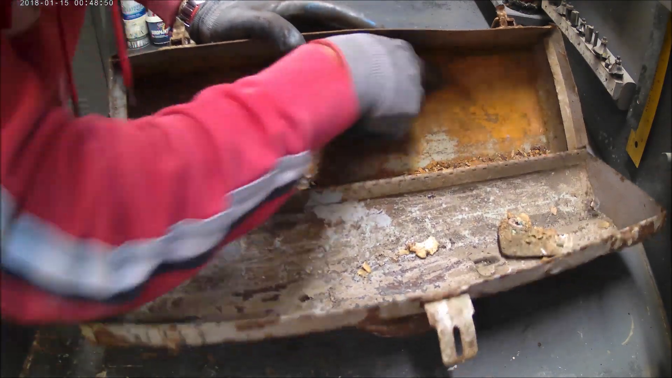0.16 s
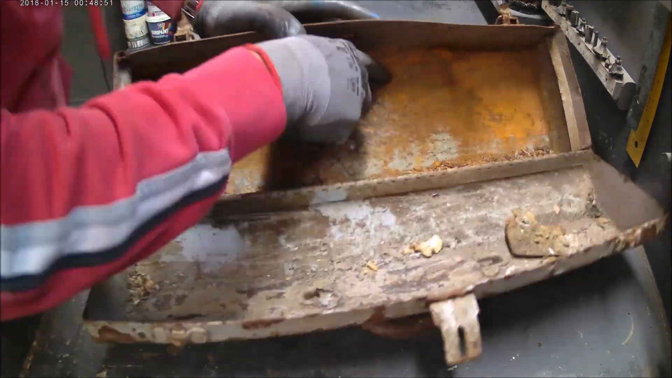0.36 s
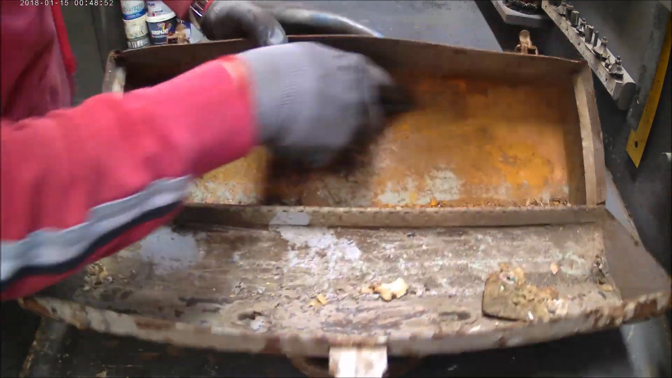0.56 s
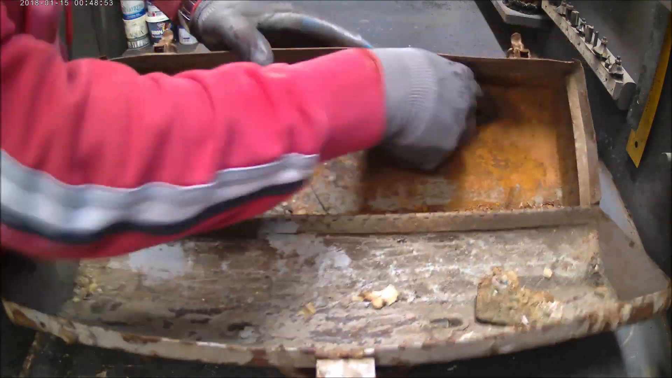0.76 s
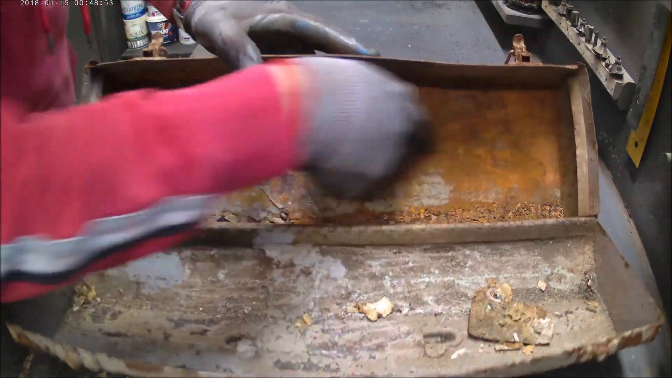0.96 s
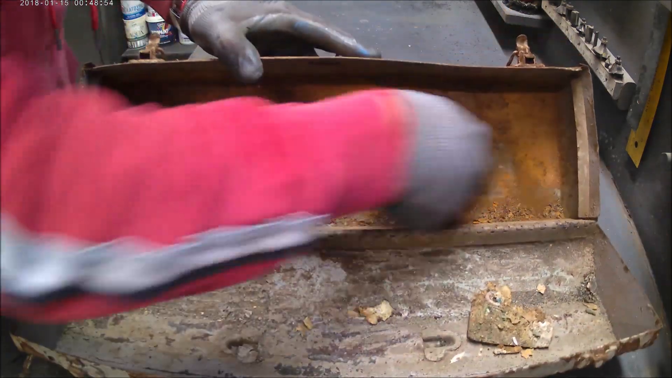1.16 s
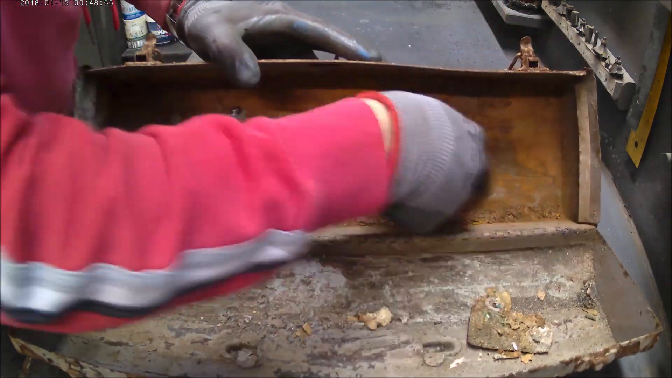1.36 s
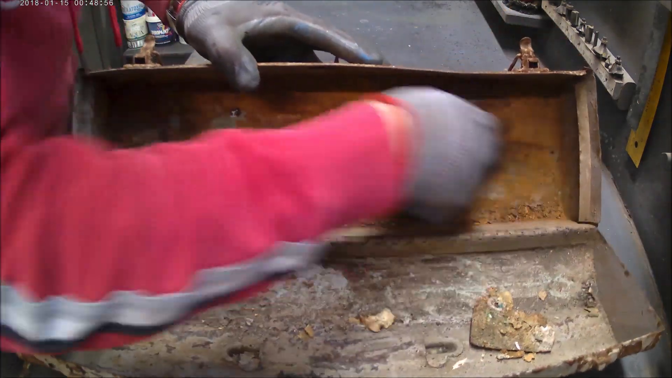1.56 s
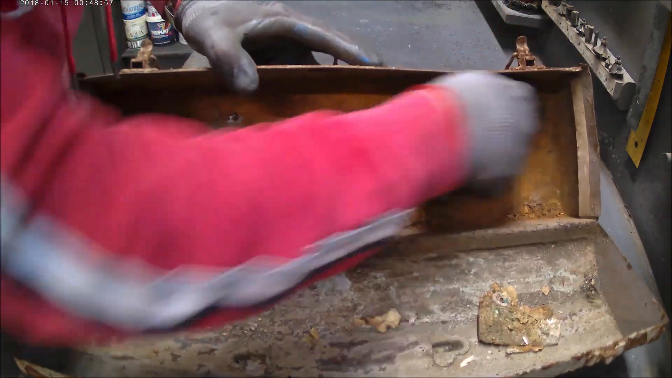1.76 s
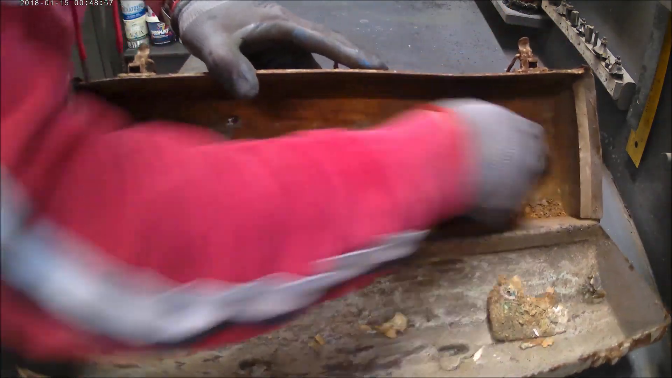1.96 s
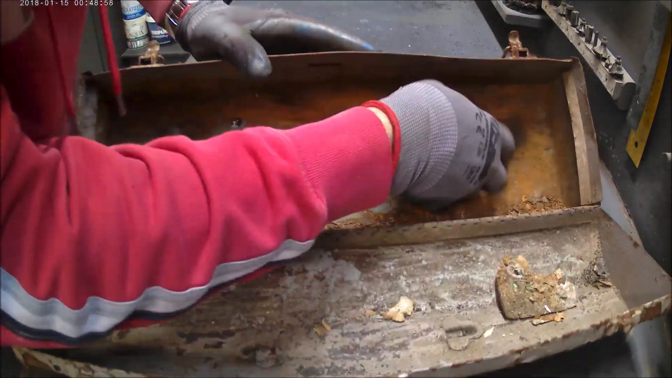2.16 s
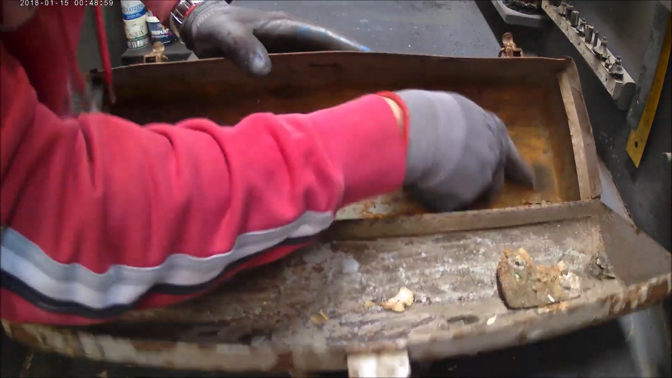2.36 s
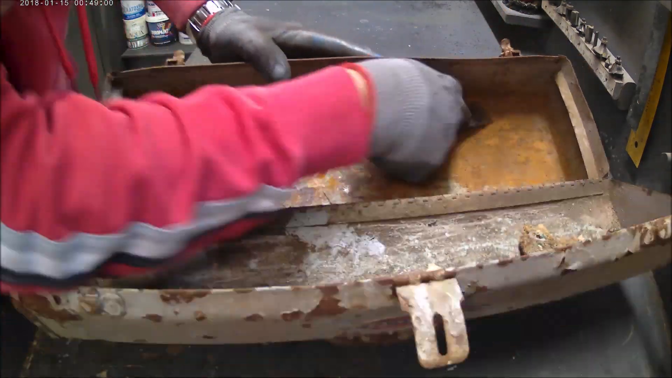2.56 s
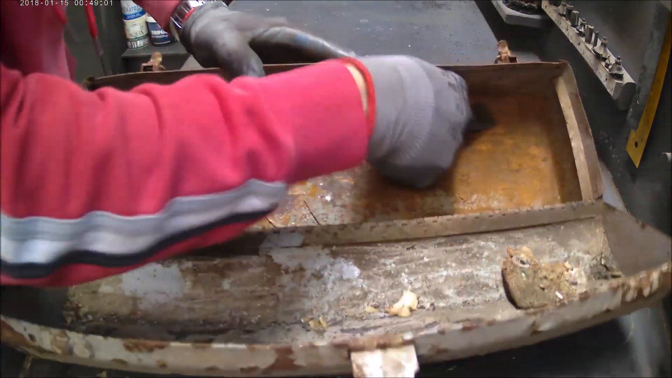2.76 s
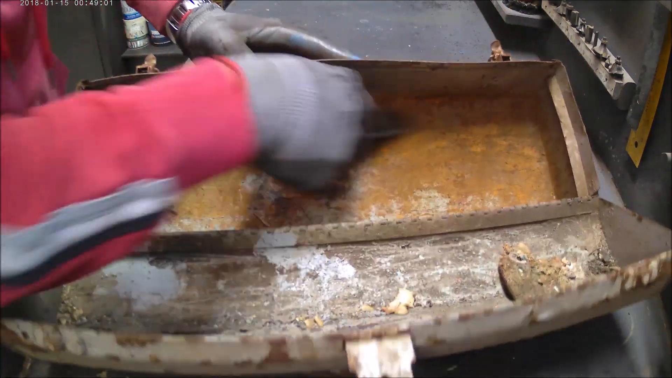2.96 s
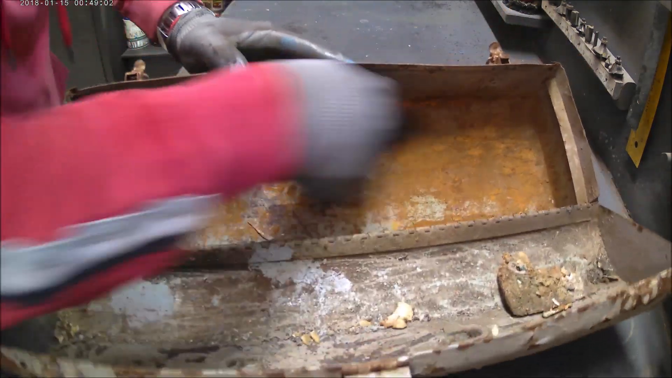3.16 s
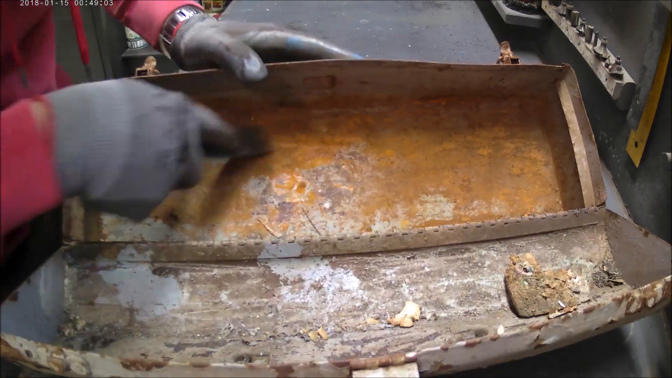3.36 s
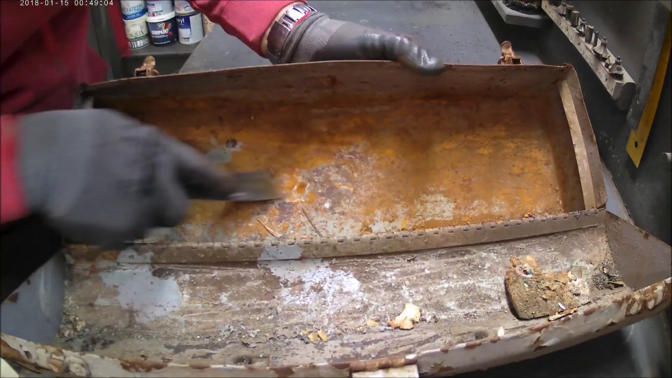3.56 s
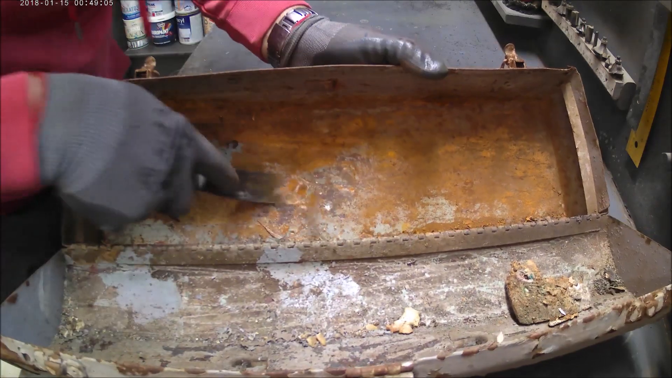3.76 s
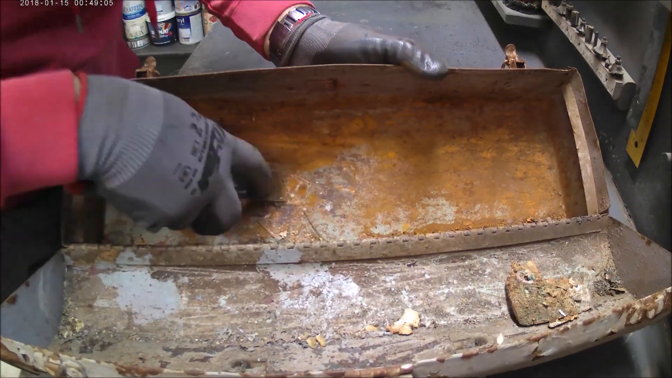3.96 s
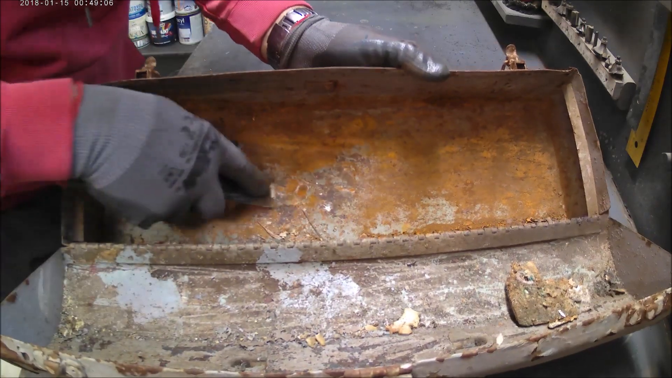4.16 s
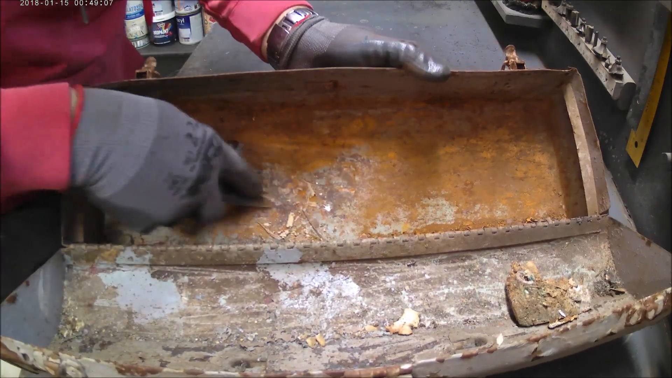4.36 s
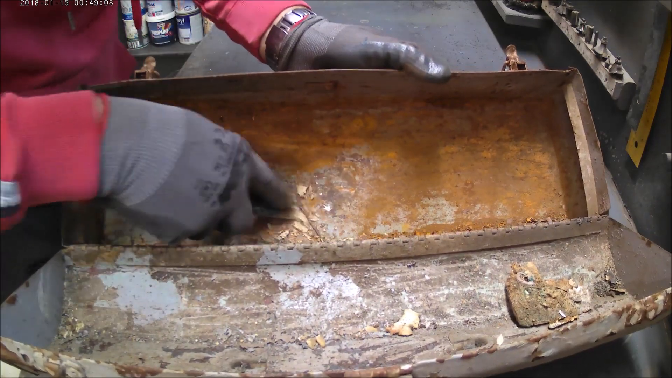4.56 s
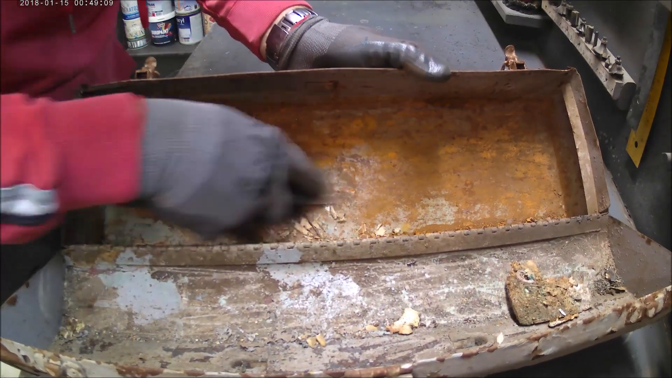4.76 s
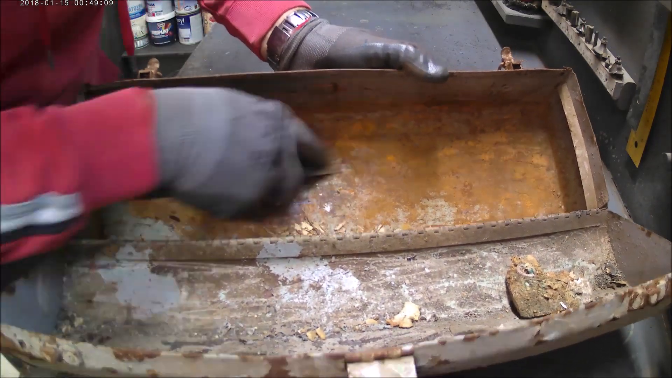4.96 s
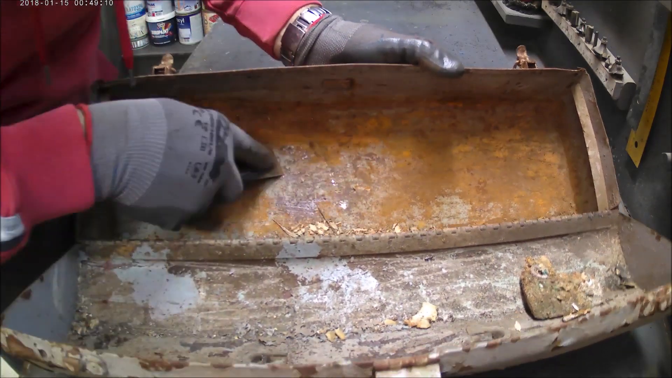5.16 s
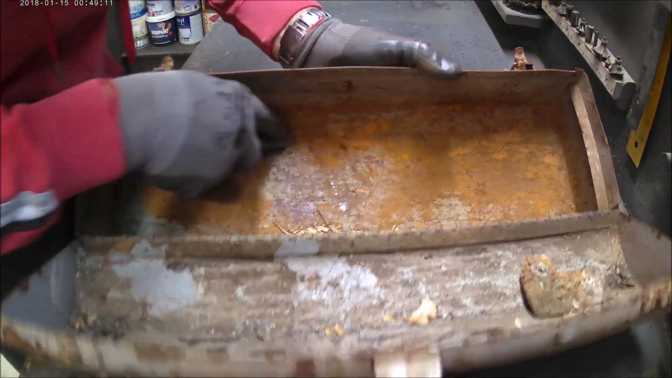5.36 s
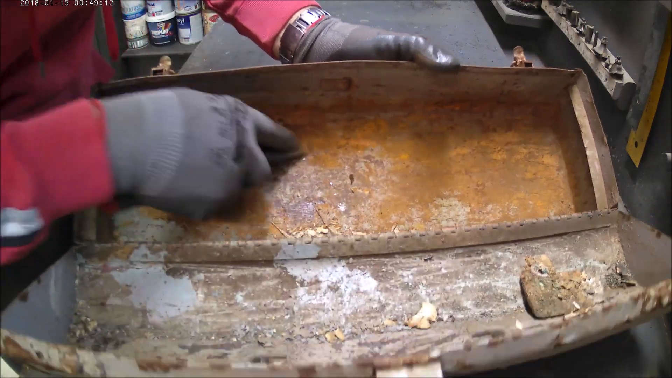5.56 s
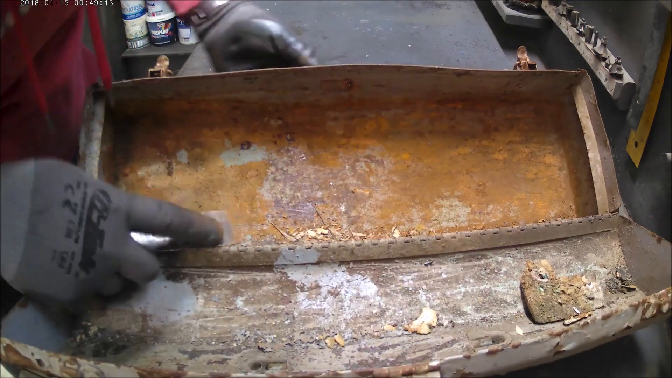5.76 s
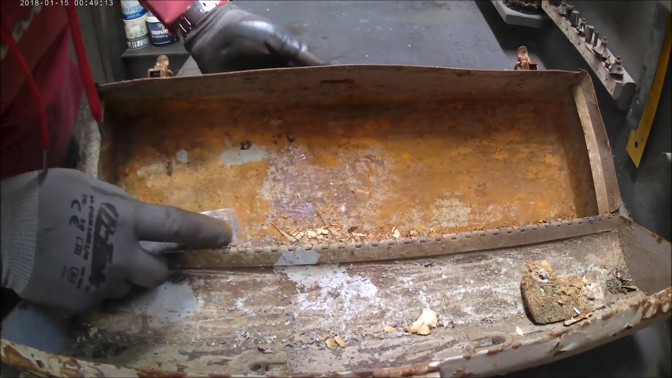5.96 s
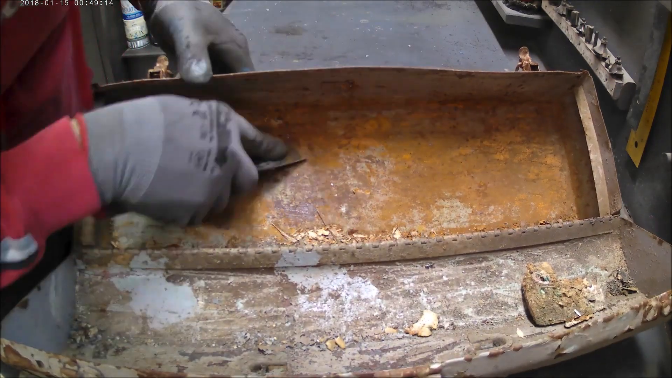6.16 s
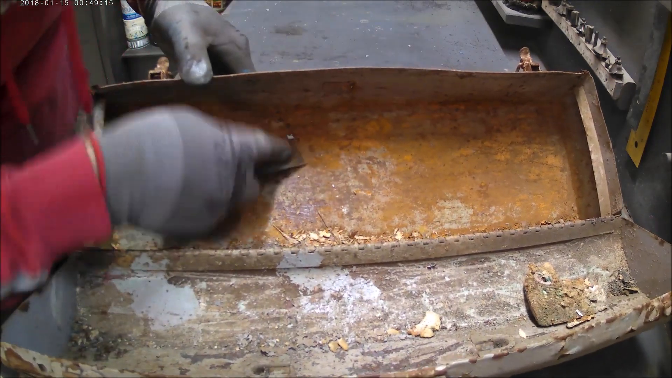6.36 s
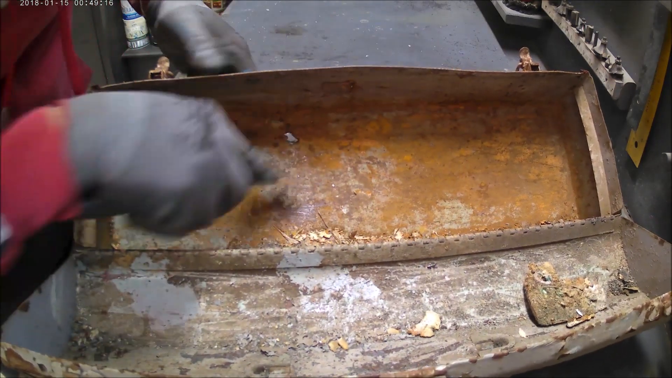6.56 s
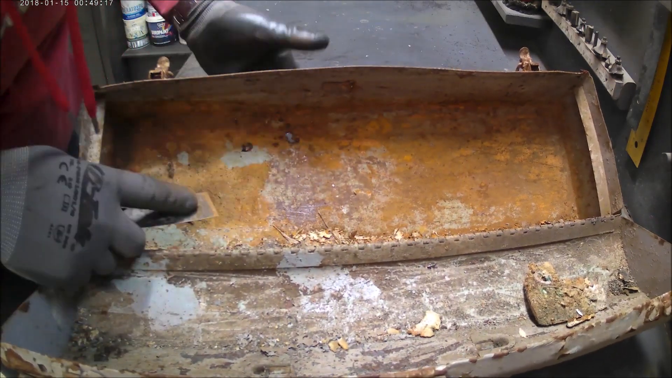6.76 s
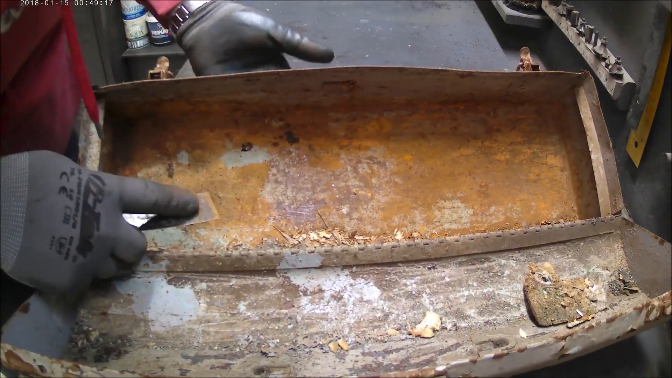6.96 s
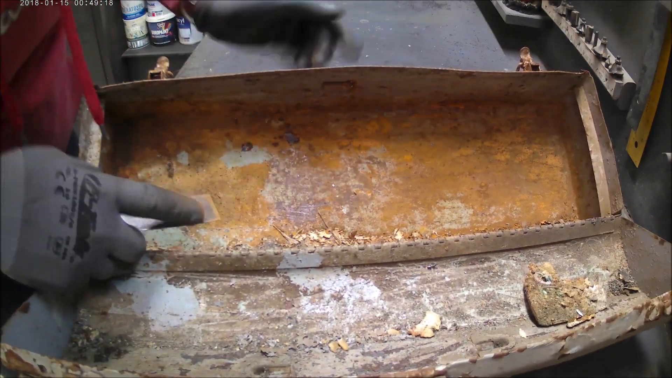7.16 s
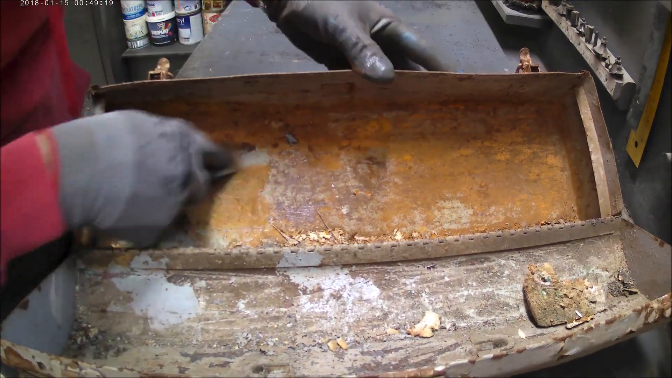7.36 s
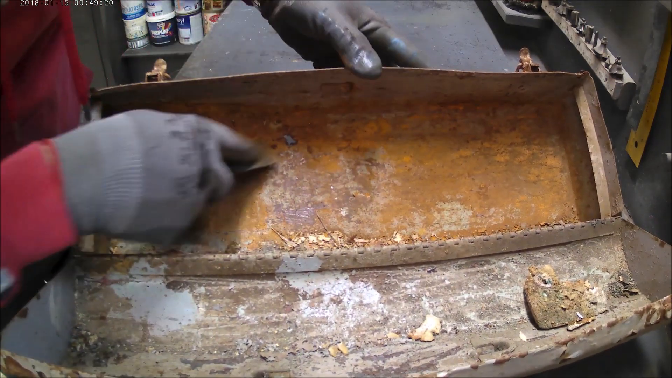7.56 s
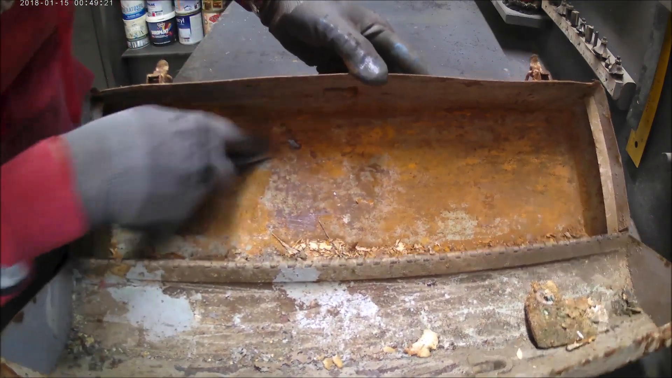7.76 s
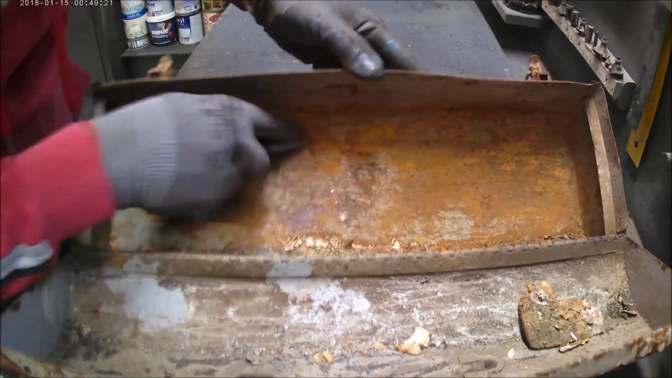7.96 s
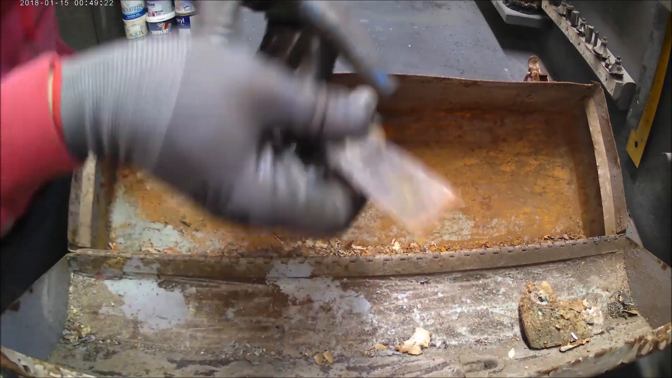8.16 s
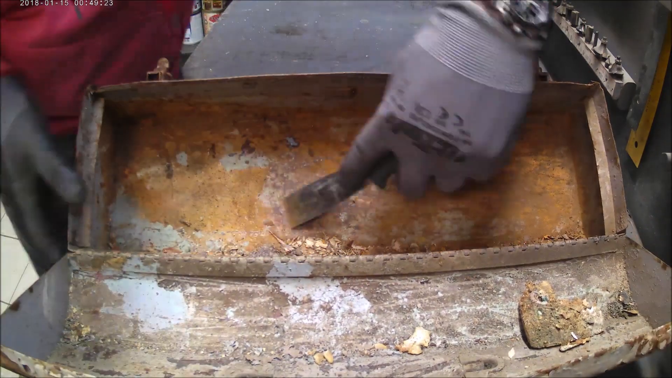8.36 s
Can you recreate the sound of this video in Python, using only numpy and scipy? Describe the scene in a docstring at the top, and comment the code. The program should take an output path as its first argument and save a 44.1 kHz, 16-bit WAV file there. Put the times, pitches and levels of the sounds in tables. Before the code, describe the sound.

Close, gritty scraping on thin ringing sheet metal, fast back-and-forth strokes broken by short pauses, with knocks and clanks of the blade.

```python
"""Very quick rasping strokes on thin ringing sheet, heard close, with knocks and hollow bonks among them:
a steel scraper blade works rust off the floor of an old metal toolbox.
Grit breaking under the edge excites the modes of sheet and blade as noise through resonators;
the blade also knocks the box as short pushes and noise bursts into such modes.
Behind lie a dull drag of the box, its short noise-tail reverberation and a quiet workshop of coloured noise."""
import sys
import numpy as np
from scipy import signal
from scipy.fft import rfft, irfft
from scipy.io import wavfile
from scipy.ndimage import uniform_filter1d

SR = 44100
rng = np.random.default_rng(int(sys.argv[2]) if len(sys.argv) > 2 else 0)


def wrap_up_sound(samples):
    """Save the sound to the file named by the first command line argument, as 16-bit audio."""
    columns = np.atleast_2d(samples).T
    # keep every value between -1 and 1, then stretch to whole-number steps
    tamed = np.clip(columns, -1, 1)
    steps = np.round(tamed * 32767).astype(np.int16)
    wavfile.write(sys.argv[1], SR, steps)


N = 371322

# strokes: top_speed_s, rise_from_rest_ms, rasp_db, sizzle_over_rasp_db (before the mix)
STROKES = [(0.001, 3.3, -16.5, -5.5), (0.036, 21.4, -17, 4.5), (0.075, 28.6, -19.5, -6),
           (0.104, 13, -15.5, 0), (0.155, 26, -24.5, -1), (0.184, 16, -20.5, 2.5), (0.225, 19, -21.5, -3),
           (0.242, 8.6, -18, -11), (0.26, 12, -21.5, 3.5), (0.303, 20, -27.5, 4), (0.331, 7.2, -20.5, -12),
           (0.362, 4.3, -23.5, 6), (0.409, 8, -38.5, -11), (0.558, 34, -47.5, -6), (0.601, 21, -21.5, -1),
           (0.623, 9.4, -21, -0.5), (0.663, 20, -27.5, -2), (0.714, 27, -20, -2), (0.752, 18, -25.5, 0.5),
           (0.794, 22, -21.5, 1), (0.835, 22, -22.5, -0.5), (0.872, 23, -17, 0.5), (0.914, 21, -19, -1),
           (0.95, 19, -15.5, -0.5), (0.986, 20, -18, -4.5), (1.025, 20, -11.5, -3.5),
           (1.067, 17.5, -17, -3.5), (1.103, 20, -14, -3.5), (1.145, 23, -18, -4.5), (1.18, 19.5, -17.5, 4),
           (1.222, 23, -20.5, -4.5), (1.253, 14.5, -15, 0), (1.293, 16, -23, 1), (1.327, 20, -17.5, 2.5),
           (1.382, 28, -21.5, 2), (1.408, 15, -21, 4.5), (1.457, 24, -21, 1), (1.492, 24, -18, 2.5),
           (1.538, 29, -23.5, -1.5), (1.56, 11.4, -19, 0.5), (1.606, 28, -25.5, -1),
           (1.636, 12, -17.5, 0.5), (1.688, 29, -19.5, -6), (1.712, 12.3, -18.5, 2.5),
           (1.76, 27, -24, -2.5), (1.78, 10, -18, -1.5), (1.828, 13.5, -25, 0.5), (1.859, 11.6, -20.5, 0),
           (1.902, 19, -20.5, -2.5), (1.928, 12, -19, 2), (1.973, 22, -22.5, -2.5), (2.003, 14, -21, 1),
           (2.05, 29, -26.5, -1), (2.071, 12, -26, 2), (2.188, 16, -61, 15), (2.21, 8.2, -44.5, 3.5),
           (2.283, 24.6, -33, -6.5), (2.313, 15, -33, -6), (2.332, 21, -29, -5.5), (2.373, 17, -31, -0.5),
           (2.392, 8, -38, 3.5), (2.419, 19, -40, -7), (2.451, 10, -39, -11), (2.487, 21, -30.5, 8),
           (2.539, 38, -32.5, -4), (2.559, 7.5, -26.5, 2), (2.585, 19, -34, -1.5), (2.623, 13, -45.5, 5),
           (2.657, 8.8, -35.5, -1), (2.672, 13, -33, 3.5), (2.708, 16, -34, 4), (2.744, 18, -23.5, 5),
           (2.783, 27, -28.5, 0.5), (2.822, 22, -25.5, 7), (2.885, 54, -28, 3), (2.904, 24, -24, 0.5),
           (2.958, 24, -22, 1.5), (3.025, 43, -28, -0.5), (3.052, 17, -24.5, 2.5), (3.089, 22, -25, -2),
           (3.121, 29.7, -17.5, 2), (3.136, 7.8, -19.5, 1.5), (3.186, 30, -22.5, 4.5),
           (3.24, 48, -23.5, 1.5), (3.292, 29.5, -20.5, -3.5), (3.331, 31.6, -25, 0.5),
           (3.397, 9.1, -19.5, -1), (3.61, 14.6, -21, -5), (3.65, 7, -40, 1), (3.674, 6.9, -23.5, -9),
           (3.72, 21, -40, -5), (3.742, 11.5, -26.5, -3), (3.784, 12, -16, -14), (3.804, 12, -21.5, -2.5),
           (3.841, 4.7, -20, -15), (3.859, 9.2, -21.5, -4.5), (3.898, 4.1, -22.5, -13.5),
           (3.912, 6.1, -23, -5.5), (3.98, 6.7, -26.5, -15), (3.994, 14, -39, -8), (4.076, 25, -47.5, 0),
           (4.153, 24, -23, -9), (4.181, 14, -30, -6), (4.202, 14.4, -19.5, -0.5), (4.236, 21, -39, -4),
           (4.264, 24, -20.5, -6), (4.298, 19, -27, -4.5), (4.32, 17.3, -16.5, -4), (4.346, 13, -35.5, 4.5),
           (4.375, 22, -16, -3.5), (4.405, 16, -26.5, -4), (4.434, 18, -12.5, -6), (4.458, 18, -28.5, 3),
           (4.485, 11, -15.5, -1.5), (4.525, 22, -29.5, -3), (4.55, 19.5, -15, -3), (4.573, 10.5, -26, -5),
           (4.604, 14.6, -17, 1), (4.636, 16, -29.5, -1), (4.657, 16.5, -17, 1), (4.692, 17, -28.5, -1),
           (4.723, 22.8, -12.5, -3), (4.758, 19.5, -24, -2), (4.786, 15.3, -15, 1.5),
           (4.835, 26.5, -21, -2), (4.866, 22.4, -13.5, -2.5), (4.9, 9.6, -21.5, -5.5),
           (4.927, 21.5, -13.5, -1), (4.988, 32, -14.5, -3), (5.009, 13.5, -9.5, -2.5),
           (5.035, 15, -16, -3), (5.061, 5.7, -9.5, -5), (5.108, 5, -16.5, -4.5), (5.135, 8.5, -30.5, -6),
           (5.162, 16.6, -12.5, -1), (5.197, 14, -23, 0), (5.232, 19, -12.5, -4), (5.267, 17.6, -20.5, -4),
           (5.293, 13.5, -11, 0.5), (5.332, 14, -20, 0), (5.357, 12.5, -15.5, 2.5), (5.398, 29.5, -27, -2),
           (5.422, 16, -20.5, -0.5), (5.475, 46, -36, -7), (5.494, 9.6, -22.5, -6), (5.526, 17, -32, -8),
           (5.543, 11, -27, -10), (5.585, 15.5, -40, -17), (5.62, 18, -32, -4), (5.639, 19, -29.5, -1.5),
           (5.696, 22, -25, 1.5), (5.742, 27, -27, 1.5), (5.821, 24, -53, 1), (5.852, 30, -54, 5),
           (5.896, 17, -66.5, 15), (5.978, 25, -61.5, 0), (6.04, 21, -54.5, 4), (6.075, 16, -72, 9),
           (6.208, 38.6, -26, -7.5), (6.24, 10, -38, -4), (6.26, 11.4, -23, -4.5), (6.315, 13, -30, -2),
           (6.339, 17, -30, -7), (6.367, 17, -29.5, -5), (6.378, 11, -28, -6), (6.425, 10.5, -27, -14),
           (6.446, 12, -27.5, -8), (6.47, 9.1, -21.5, -3), (6.503, 15, -34, 7), (6.545, 8.6, -25, 1),
           (6.595, 10, -27.5, 0.5), (6.703, 9.1, -71.5, 16.5), (6.781, 11, -65.5, 5.5),
           (6.851, 15, -79, 20), (6.899, 15, -70, 12), (6.94, 34, -70, 16.5), (6.979, 33, -64, 9.5),
           (7.055, 14, -61, 2), (7.085, 19, -48, 5.5), (7.34, 5, -48, -2), (7.386, 33, -24.5, -1.5),
           (7.403, 7.4, -27, -3), (7.457, 11, -62, 10), (7.501, 26, -47.5, -2), (7.556, 34, -26.5, -4),
           (7.658, 23, -31.5, -8.5), (7.695, 13, -18.5, -6), (7.73, 15, -27, -5), (7.759, 16.5, -17, -4),
           (7.816, 41, -16.5, -5.5), (7.855, 19, -29, -2), (7.876, 12, -17.5, -4.5),
           (7.907, 21.2, -31.5, 3.5), (7.926, 11, -31, -9.5), (7.973, 15, -48, -1), (8.001, 13, -41, 1),
           (8.022, 12.7, -29.5, -2), (8.048, 21, -27, -0.5), (8.079, 10.3, -32, 1),
           (8.419, 22, -55.5, -0.5)]
# knocks of the blade on the box: start_s, bonk_db, thud_db, crack_db (before the mix)
KNOCKS = [(.332, -34, -28, -9.5), (.361, -10, -33, 2), (.403, -15, -34, -46), (.448, -21, -34, -46),
          (.795, -31, -41.5, -40), (.967, -38.5, -31, -31), (1.573, -14.5, -27.5, -16),
          (1.724, -37, -25, -3), (1.868, -31, -18, -7), (1.938, -9.5, -22, -13), (2.01, -9, -27.5, -18),
          (2.084, -10, -32, -17), (2.285, -19, -42, -25), (2.364, -29, -19, -29), (2.445, -38, -43, -35),
          (2.569, -24, -20, -38), (2.652, -30, -33, -25), (2.738, -7, -19.5, -17), (2.8, -19.5, -17.5, -3),
          (2.954, -39, -16, -7), (3.133, -7, -12, -33), (3.331, -13, -17, -8.5), (3.393, -26, -13.5, 0.5),
          (3.608, -19.5, -48, -35), (3.623, -10, -46.5, -35.5), (3.67, -13, -31, -34),
          (3.781, -11.5, -26, -11), (3.839, -14, -34.5, -24), (3.856, -8.5, -49, -35),
          (3.896, -16, -24, -23), (3.975, -28, -32, -38), (4.14, -27, -43.5, -19), (4.178, -20, -38, -40),
          (4.255, -15, -26, -11.5), (4.36, -17.5, -52, -30), (4.43, -24.5, -25.5, -32.5),
          (4.551, -3, -49.5, -29), (4.603, -4.5, -36.5, -30), (4.709, -14.5, -50, -33),
          (4.857, -17.5, -47, -37), (4.918, -27.5, -42, -28.5), (5.005, -6.5, -29, -37),
          (5.059, -23, -41.5, -43), (5.104, -4.5, -13, 1.5), (5.154, -13, -36, -24),
          (5.213, -19.5, -23.5, -34), (5.285, -28, -21, -11), (5.471, -19, -56, -40),
          (5.578, -21, -51, -40), (5.693, -11, -23, -8), (5.737, -13.5, -15, -8), (5.849, -53, -50, -25),
          (6.255, -28, -35, -30), (6.377, -19.5, -47, -35.5), (6.419, -16.5, -37, -45),
          (6.537, -17, -24.5, -25), (7.636, -45, -43, -36), (7.686, -22, -33, -13), (7.756, -13, -43, -34),
          (7.797, -34, -16.5, -24), (7.902, -14.5, -24, -40), (8.079, -14, -25, -32.5)]
# low, middle and high modes of sheet and blade: pitch_hz, width_hz, far_end_db, near_end_db (relative)
BOOM_MODES = [(337.4, 140, -22, -10.5), (483, 52, -6.5, -4.5), (538.4, 38, 6, 4), (593, 39, -5.5, 6),
              (666, 63, -12.5, -5.5), (788, 18, 1, 3), (864, 21, 4, -22)]
RASP_MODES = [(1198, 82, 1.5, -19), (1318, 160, -5, 0.5), (1697, 25, -4, -2.5), (1754, 140, -2, -1.5),
              (2132, 200, -10, -8.5), (2237, 71, -1.3, -6.5), (2536, 410, -3, -4.5),
              (2776, 190, -16, -11.5), (2820, 140, -1, -6)]
SIZZLE_MODES = [(3600, 71, -14.5, 0), (3555, 120, 8.5, 8.5), (3918, 150, 10, 8.5), (4280, 130, -0.5, 9.5),
                (4690, 100, 4.5, 8), (5110, 190, 6, 5), (5420, 530, -0.5, -23.5), (5560, 240, -8.5, -15),
                (6970, 210, -14.5, -8.5), (7380, 430, -16, -7.5)]


def undb(db):
    """Amplitude ratio of a level in dB."""
    return 10 ** (np.asarray(db) / 20)


def unit(x):
    """Scale to rms 1."""
    return x / np.sqrt(np.mean(x ** 2))


def band(x, lo_hz, hi_hz):
    """Gentle Butterworth band-pass."""
    return signal.sosfilt(signal.butter(2, [lo_hz, hi_hz], "band", fs=SR, output="sos"), x)


def ring(x, pitch_hz, width_hz):
    """One mode; white noise of rms 1 gives the same peak density whatever the width."""
    b, a = signal.iirpeak(pitch_hz, pitch_hz / width_hz, fs=SR)
    return signal.lfilter(b, a, x)


def colour(x, spectrum):
    """Causal filter through (Hz, dB) points, from the folded cepstrum."""
    hz, db = np.transpose(spectrum)
    bins_hz = np.arange(1, 2050) * SR / 4096
    log_gain = np.interp(np.log(bins_hz), np.log(hz), db) * np.log(10) / 20
    cepstrum = irfft(log_gain)
    cepstrum[1:2048] *= 2
    cepstrum[2049:] = 0
    impulse = irfft(np.exp(rfft(cepstrum)))
    return signal.fftconvolve(x, impulse)[:N]


def walk(rate_hz):
    """Random levels held 1 / rate_hz and slewed; spread near 1."""
    hold = int(SR / rate_hz)
    steps = np.repeat(rng.standard_normal(N // hold + 1), hold)
    return 1.2 * uniform_filter1d(steps, hold)[:N]


def body(force, gain, modes, place, shift_db, pitch_hz=0, lift_db=0, reach=0.055):
    """The force drives each mode as the spot under the blade allows; modes near the favoured pitch are lifted."""
    drives, total_power = [], 0
    for mode_hz, width_hz, far_db, near_db in modes:
        lift = lift_db * np.exp(-((pitch_hz - mode_hz) / (reach * mode_hz)) ** 2)
        drive = undb(far_db + (near_db - far_db) * place + lift)
        drives.append(drive)
        total_power = total_power + drive ** 2 * width_hz * np.pi / SR
    force = force * gain / np.sqrt(total_power)
    out = 0
    for drive, (mode_hz, width_hz, *_) in zip(drives, modes):
        out = out + ring(force * drive * undb(shift_db * walk(22.)), mode_hz, width_hz)
    return out


def workshop():
    """Quiet workshop: coloured noise with a slowly wandering level."""
    # spectrum: pitch_hz, density_db (relative)
    spectrum = [(18, 0.5), (60, 3), (300, -5), (580, 1.5), (930, -17.5), (1500, -6), (4800, -18.5),
                (10000, -10.5), (15800, -20)]
    level_db = -76.5 + 1.5 * walk(7.6)
    return undb(level_db) * unit(colour(rng.standard_normal(N), spectrum))


def cavity(x):
    """The open box and the bench scatter the sound into a short dense tail."""
    t60_s, level_db = 0.14, -13.5
    t = np.arange(int(.35 * SR)) / SR
    tail = rng.standard_normal(len(t)) * 10 ** (-3 * t / t60_s)
    scattered = signal.fftconvolve(x, tail / np.linalg.norm(tail))[:N]
    return undb(level_db) * band(scattered, 200.0, 4800.0)


def rumble(rasp, place):
    """Dull uneven drag of the box on the bench, sluggishly following the effort of the hand."""
    # spectrum: pitch_hz, density_db (relative)
    spectrum = [(15, -5.5), (30, -4), (90, -1.5), (140, -2), (212, 6.5), (260, 4), (330, -5), (450, -23.5),
                (900, -39.5)]
    lag_s, level_db, near_end_db, db_per_effort_db = 0.013, -49.5, 1, 0.45  # level_db for a -22 dB rasp
    keep = np.exp(-1 / (lag_s * SR))
    effort = signal.lfilter([1 - keep], [1, -keep], rasp ** 2)
    effort_db = 10 * np.log10(effort + 1e-12)
    db = level_db + near_end_db * place + db_per_effort_db * (effort_db + 22) + 3.5 * walk(30.)
    return undb(db) * unit(colour(rng.standard_normal(N), spectrum))


def singing_modes():
    """Fine rubbing keeps one narrow mode sounding: noise through two resonators, with soft ends."""
    # spells: start_s, end_s, pitch_hz, level_db
    spells = [(.015, 0.132, 802, -29), (.44, .5, 545, -38.5), (0.523, 0.587, 560, -38.5),
              (.605, 0.661, 1446, -34), (3.395, 3.432, 4770, -28.5), (5.902, 5.967, 1346, -70),
              (6.075, 6.15, 1329, -71)]
    out = np.zeros(N)
    for start_s, end_s, pitch_hz, level_db in spells:
        i, size = int(start_s * SR), int((end_s - start_s) * SR)
        tone = ring(rng.standard_normal(8192), pitch_hz, 25.)
        tone = ring(tone, pitch_hz, 40.)[-size:]
        out[i:i + size] += undb(level_db) * unit(tone) * signal.windows.tukey(size, .4)
    return out


def bonks(place):
    """A push of a millisecond sets the floor ringing, most of all in low modes near one pitch."""
    far_hz, near_hz, scatter_hz = 574, 630, 25.
    push, pitch_hz = np.zeros(N), far_hz + (near_hz - far_hz) * place
    for (start_s, bonk_db, *_), chance in zip(KNOCKS, rng.standard_normal(len(KNOCKS))):
        i = int(start_s * SR)
        push[i:i + 44] += undb(bonk_db) * np.hanning(44)
        pitch_hz[i:i + 44] += scatter_hz * chance
    floor = body(push, 0.96, BOOM_MODES, place, shift_db=3.0, pitch_hz=pitch_hz, lift_db=19.0, reach=0.16)
    return undb(-10.0) * band(floor, 450.0, 1300.0)


def knocks(place):
    """A soft push of a few milliseconds sounds the low modes; a short noise burst sounds the high ones."""
    # low modes: pitch_hz, width_hz, level_db (relative)
    thud_modes = [(211, 14, 1.5), (280, 17, -3.5), (375, 31.7, 10), (600, 60, 6), (152.8, 59, -18)]
    push, crack = np.zeros(N), np.zeros(N)
    fade = np.exp(-np.arange(600) / (0.0062 * SR))
    bursts = rng.standard_normal((len(KNOCKS), 600))
    for (start_s, _, thud_db, crack_db), burst in zip(KNOCKS, bursts):
        i = int(start_s * SR)
        push[i:i + 600] += undb(thud_db) * fade * (1 + 0.8 * burst)
        crack[i:i + 600] += undb(crack_db) * fade * burst
    thud = np.zeros(N)
    for k, (pitch_hz, width_hz, level_db) in enumerate(thud_modes):
        thud += (-1) ** k * undb(level_db) * ring(push, pitch_hz, width_hz)  # alternating sign
    clank = body(crack, 0.83, RASP_MODES + SIZZLE_MODES, place, shift_db=5.0)
    return undb(11.0) * band(thud, 140.0, 1200.) + undb(-15.0) * band(clank, 800., 12000.0)


def patch_rows():
    """Row of the patch of sheet that each stroke works."""
    # patches worked in turn: start_s, favoured_rasp_hz, favoured_sizzle_hz,
    # boom_over_rasp_db (for a -22 dB stroke), fall_power (exponent: low for a sweep, high for a jab)
    patches = np.array([(0, 2350, 5200, -6.5, 3.04), (.4, 1360, 3520, -7, 2.6),
                        (.65, 2850, 5120, -8.5, 2.9), (.97, 2140, 3670, -8.5, 3),
                        (1.6, 2280, 5200, -6.5, 3.5), (2.15, 3000, 3860, -8, 3.3),
                        (2.5, 2800, 5100, -5, 2.64), (3.0, 1650, 5000, -4, 2.9),
                        (3.37, 1650, 4700, -0.5, 2.6), (3.6, 1690, 3450, -4.5, 3.3),
                        (3.77, 1320, 3540, -3, 5.3), (4.13, 2080, 3850, -5, 3.35),
                        (4.75, 1654, 3760, -5, 3.5), (5.45, 1720, 4300, -4.5, 3.1),
                        (5.66, 2800, 4700, -4.5, 2.8), (6.17, 1626, 3870, -5, 6.5),
                        (6.43, 2880, 3800, -7.5, 6.5), (7.3, 2510, 3370, -7, 3.25),
                        (7.89, 2500, 4060, -5.5, 3.2)])
    return patches[np.searchsorted(patches[:, 0], np.array(STROKES)[:, 0]) - 1]


def favoured_pitches():
    """Pitches that the patch favours, held for a stroke; some strokes stray to a random mode."""
    stray_share = .4
    tops_s, hz = np.array(STROKES)[:, 0], patch_rows()[:, 1:3]
    chance = rng.random((len(tops_s), 4))
    for k, modes in enumerate((RASP_MODES, SIZZLE_MODES)):
        pick = (chance[:, k] * len(modes)).astype(int)
        other_hz = np.array(modes)[pick, 0]
        hz[:, k] = np.where(chance[:, k + 2] < stray_share, other_hz, hz[:, k])
    midpoints_s = (tops_s[1:] + tops_s[:-1]) / 2
    return hz[np.searchsorted(midpoints_s, np.arange(N) / SR)].T


def stroke_gains():
    """From rest to top speed to rest, a quarter cosine each way; grit power grows with speed.

    Returns rows rasp, boom, sizzle."""
    # light trailing over the rust in pauses and between jabs: start_s, end_s, rasp_db, boom_over_rasp_db
    trails = [(0.42, 0.613, -53.5, 12.5), (2.084, 2.24, -54, -14), (3.414, 3.607, -59, 10.5),
              (4.004, 4.114, -69, -2), (5.763, 5.93, -57, -7), (5.96, 6.147, -72.5, 0),
              (6.234, 6.613, -47, -1), (6.623, 7.144, -70.5, -2), (7.416, 7.54, -65, 1)]
    overlap_ms, longest_stop_ms = 1.9, 28.1  # a stroke dies away as the next sets off
    rise_power, boom_db_per_db = 2.37, 0.64  # the boom grows more slowly than the rasp
    trail_sizzle_db, trail_flutter_db = -1.5, 2
    power, t = np.full((3, N), 1e-12), np.arange(N) / SR
    next_starts_s = [top_s - rise_ms / 1000 for top_s, rise_ms, *_ in STROKES[1:]] + [N / SR]
    for stroke, next_s, patch in zip(STROKES, next_starts_s, patch_rows()):
        top_s, rise_ms, rasp_db, sizzle_db = stroke
        *_, patch_boom_db, fall_power = patch
        fall_ms = np.clip(1000 * (next_s - top_s) + overlap_ms, 6, longest_stop_ms)
        span = slice(max(int((top_s - rise_ms / 1000) * SR), 0), int((top_s + fall_ms / 1000) * SR))
        from_top_ms = 1000 * (t[span] - top_s)
        rising = from_top_ms < 0
        speed = np.abs(np.cos(np.pi / 2 * from_top_ms / np.where(rising, rise_ms, fall_ms)))
        boom_db = patch_boom_db + (boom_db_per_db - 1) * (rasp_db + 22)
        levels_db = rasp_db + np.array([[0], [boom_db], [sizzle_db]])
        power[:, span] += undb(2 * levels_db) * speed ** np.where(rising, rise_power, fall_power)
    flutter_db = trail_flutter_db * walk(40.)
    for start_s, end_s, rasp_db, boom_db in trails:
        span = slice(int(start_s * SR), int(end_s * SR))
        soft_ends = signal.windows.tukey(len(t[span]), .3)
        levels_db = rasp_db + np.array([[0], [boom_db], [trail_sizzle_db]]) + flutter_db[span]
        power[:, span] += undb(2 * levels_db) * soft_ends
    return np.sqrt(power)


def grit(per_s, scatter_db, smooth):
    """Flakes that snap at random moments with very uneven sizes, over fine even rubbing; rms 1."""
    sizes = rng.standard_normal(N) * undb(scatter_db * rng.exponential(size=N))
    snaps = (rng.random(N) < per_s / SR) * sizes
    return unit(unit(snaps) + smooth * rng.standard_normal(N))


def scraping(place, rasp, boom, sizzle):
    """Grit under the edge rings sheet and blade, and hisses broadly."""
    # hiss between and above the high modes: pitch_hz, density_db (relative)
    hiss_spectrum = [(300, -52.5), (1500, -40.5), (2800, -37.5), (3500, -19), (5500, -9), (7000, -14.5),
                     (8500, -17), (12000, -27.5), (15500, -31)]
    chatter_db = 1.5  # the edge skips over the rust
    force = grit(per_s=4000., scatter_db=1.5, smooth=0.87) * undb(chatter_db * walk(250.))
    rasp_hz, sizzle_hz = favoured_pitches()
    low = body(force, boom, BOOM_MODES, place, shift_db=2.0)
    low = band(low, 260.0, 888.0)
    middle = body(force, rasp, RASP_MODES, place, shift_db=3.0, pitch_hz=rasp_hz, lift_db=7.5)
    middle = band(middle, 1312.0, 2770.0)
    high = body(force, sizzle, SIZZLE_MODES, place, shift_db=2.0, pitch_hz=sizzle_hz, lift_db=7.5)
    high = band(high, 3600.0, 8220.0)
    hiss = colour(force * sizzle, hiss_spectrum) / np.std(colour(force, hiss_spectrum))
    return undb(-3.0) * low + undb(-1.5) * middle + undb(-4.5) * high + undb(-5.5) * hiss


def scene():
    """Scraping, knocks, bonks and singing modes in the box, with its tail, its drag and the workshop."""
    # where the blade works along the box: time_s, place (0 far end .. 1 near end)
    blade_path = [(0, 0.17), (.5, 0.72), (.7, 0.01), (2.0, 0.01), (2.6, 0.92), (3.3, 0.73), (3.7, 0.88),
                  (5.4, 0.75), (6.199, 0.59), (7.3, 0.45), (8.42, 0.39)]
    times_s, places = np.transpose(blade_path)
    place = np.clip(np.interp(np.arange(N) / SR, times_s, places), 0, 1)
    rasp, boom, sizzle = stroke_gains()
    box = scraping(place, rasp, boom, sizzle) + knocks(place) + bonks(place) + singing_modes()
    return (box + cavity(box) + rumble(rasp, place) + workshop())[None]


def record(dry):
    """The small microphone's input rounds the loudest peaks and cuts the top."""
    clip_level, top_hz = .72, 15700
    rounded = dry / (1 + np.abs(dry / clip_level) ** 6) ** (1 / 6)
    return signal.sosfilt(signal.ellip(10, .2, 75, top_hz, fs=SR, output="sos"), rounded)


dry = scene()
out = record(dry)
wrap_up_sound(out)
```